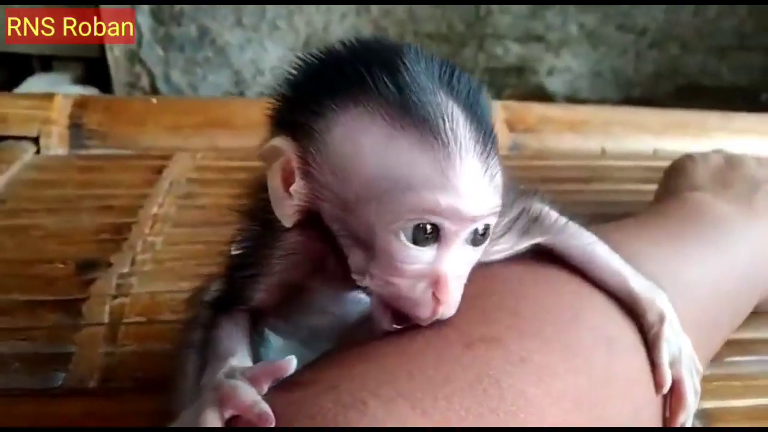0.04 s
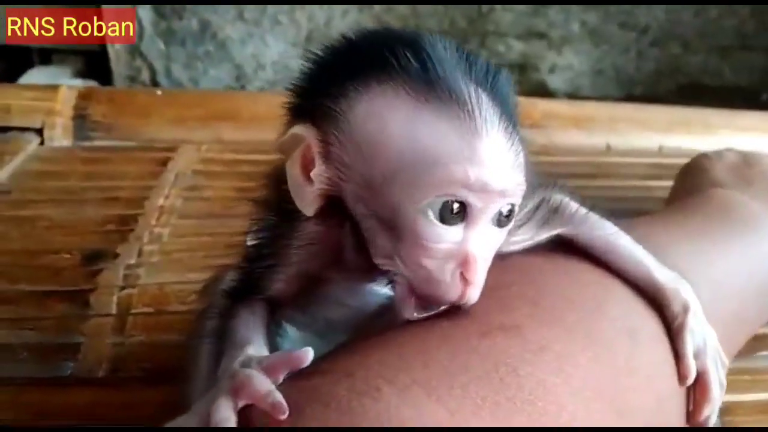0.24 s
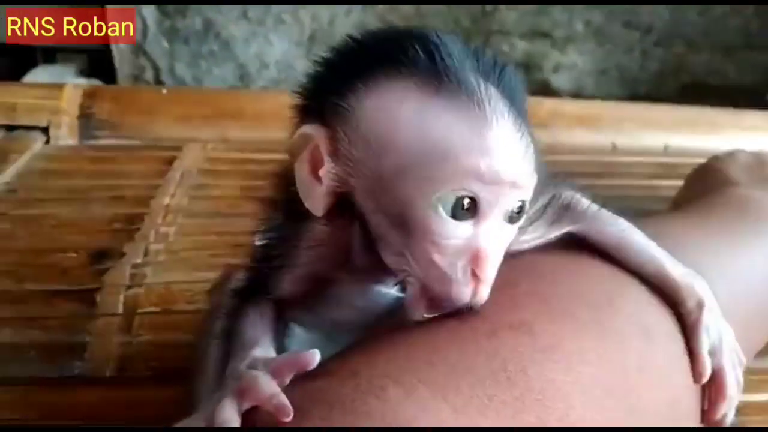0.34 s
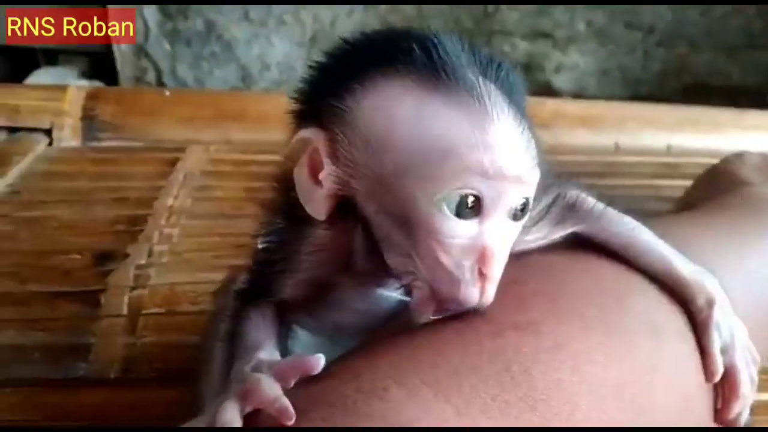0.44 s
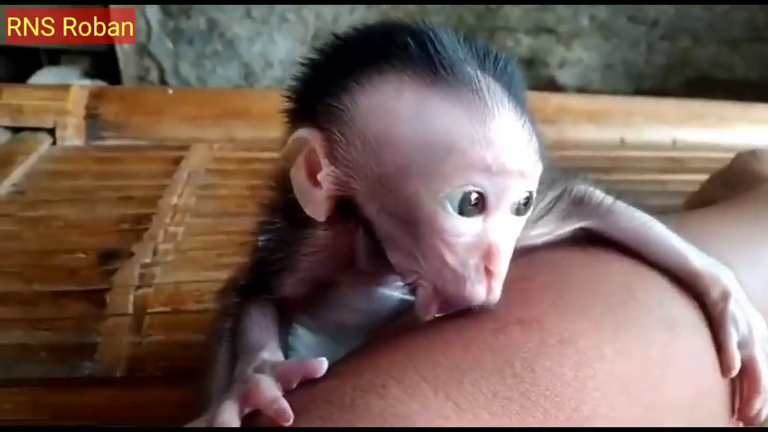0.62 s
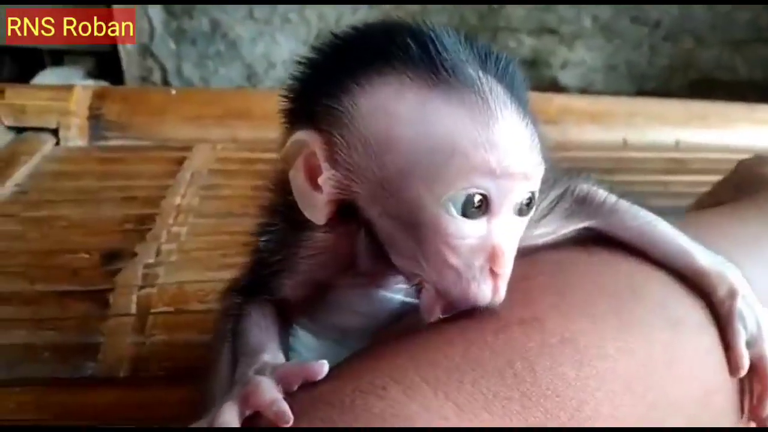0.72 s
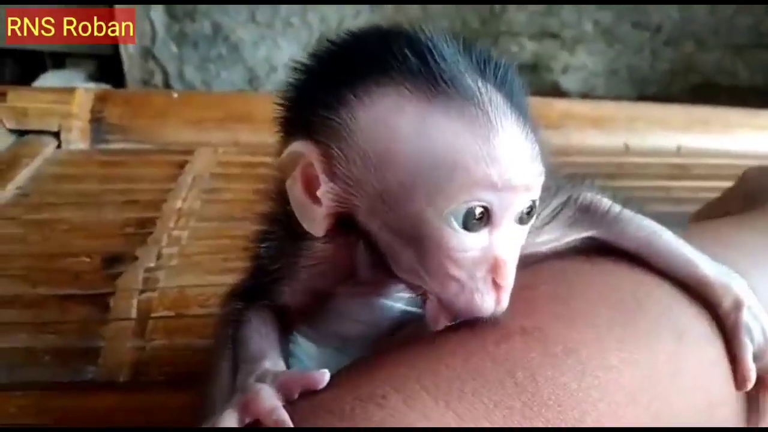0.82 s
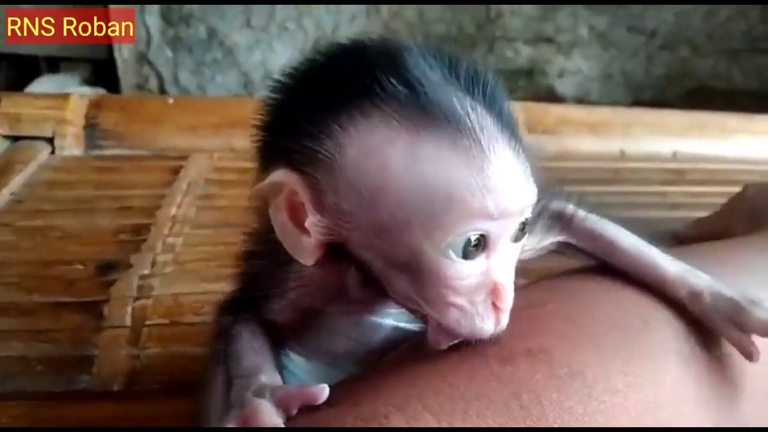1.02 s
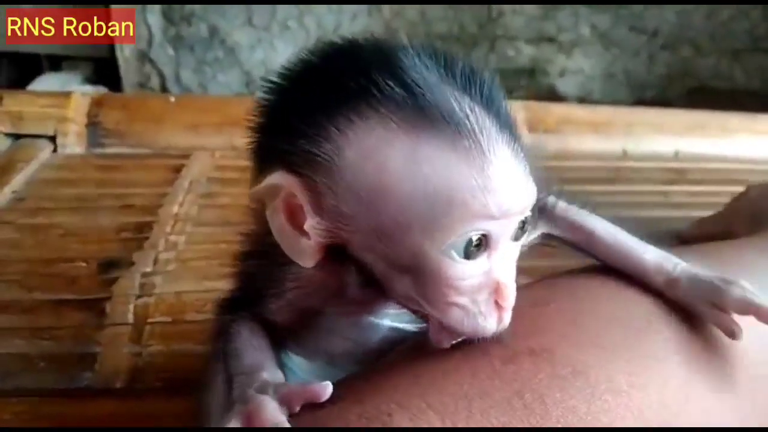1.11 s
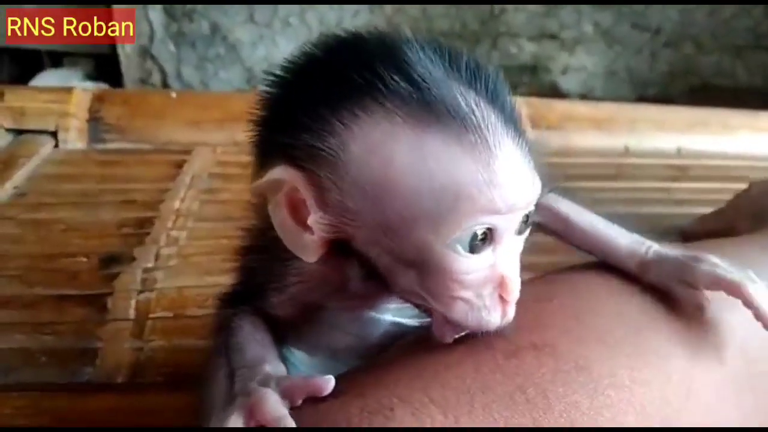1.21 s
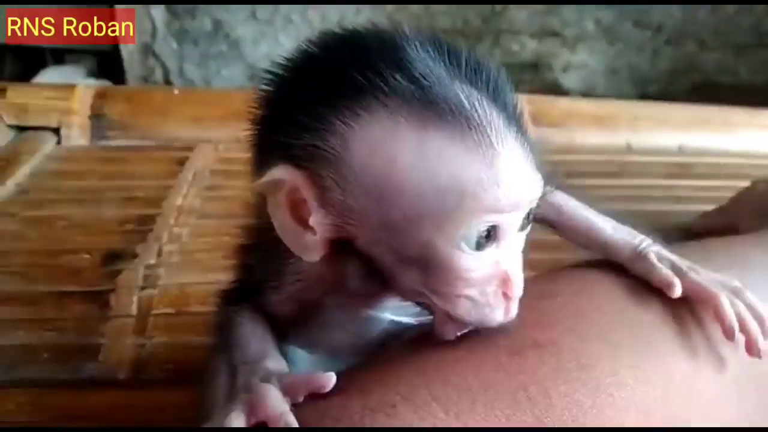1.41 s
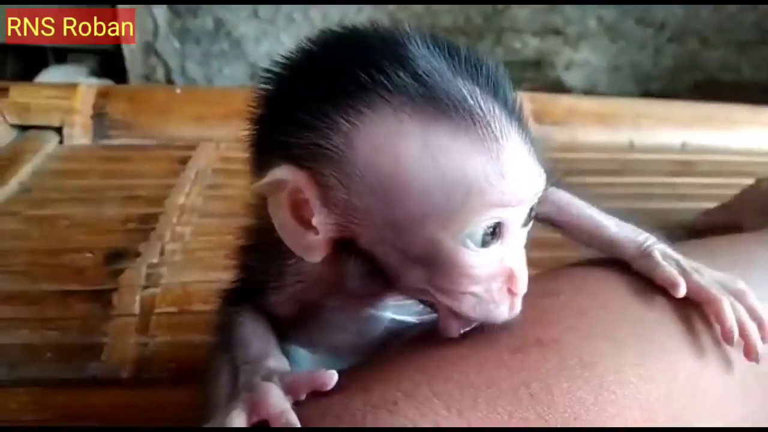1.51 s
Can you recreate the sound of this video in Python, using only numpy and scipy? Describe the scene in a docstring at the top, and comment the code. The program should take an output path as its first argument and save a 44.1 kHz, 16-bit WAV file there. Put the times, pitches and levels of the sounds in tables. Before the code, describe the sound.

Close up in a small room, a baby monkey lets out a shrill, slightly raspy squeal ending in two quick chirps. Then come a faint dry rustle, two soft microphone bumps and two small ticks, over a low outdoor rumble.

```python
"""A small room, a baby monkey close to a phone. It squeals once: a clear rising whistle that starts
to waver and breaks into two falling chirps, its partials shaped by the mouth and roughened by rasp.
The room answers, and more faintly the yard. Far birds whistle outside over a rumble of air and traffic.
A dry rustle follows, then two soft thumps through the phone's body, two ringing ticks and a scrape."""
import sys
import numpy as np
from scipy import signal
from scipy.fft import rfft, irfft, next_fast_len
from scipy.io import wavfile
from scipy.ndimage import uniform_filter1d, map_coordinates

SR = 44100
rng = np.random.default_rng(int(sys.argv[2]) if len(sys.argv) > 2 else 0)


def master(y):
    """Save y as 16-bit WAV."""
    cut = np.clip(np.atleast_2d(y).T, -1, 1)
    pcm = np.round(cut * 32767)  # scale
    wavfile.write(sys.argv[1], SR, pcm.astype(np.int16))


N = 68355
T = np.arange(N) / SR
TOP_HZ = 15720


def amp(db):
    """dB to gain."""
    return 10 ** (np.asarray(db) / 20)


def unit(x):
    """Scale to rms 1."""
    return x / np.sqrt(np.mean(x ** 2) + 1e-20)


def over_hz(points, hz):
    """Interpolate (freq_hz, value) points on a log axis."""
    freq_hz, value = np.transpose(points)
    return np.interp(np.log(hz + 1), np.log(freq_hz + 1), value)


def over_time(points):
    """Interpolate (time_s, value) points at every sample."""
    return np.interp(T, *np.transpose(points))


def wobble(rate_hz):
    """Smooth random curve, rms near 1."""
    return map_coordinates(rng.standard_normal(4096), [T * rate_hz])


def gate(start_s, end_s, edge_s):
    """Window with soft edges."""
    return np.sin(np.pi / 2 * np.clip(np.minimum(T - start_s, end_s - T) / edge_s, 0, 1)) ** 2


def filtered(x, response):
    """Apply the gain response(hz)."""
    size = next_fast_len(N + SR // 2)
    return irfft(rfft(x, size) * response(np.fft.rfftfreq(size, 1 / SR)), size)[:N]


def rush(spectrum, patchy_db):
    """Coloured noise, rms 1, with random gain patches in time and frequency."""
    bins = signal.stft(rng.standard_normal(N), nperseg=512)[2]
    patches = uniform_filter1d(rng.standard_normal(bins.shape), size=4, axis=0)
    patches = uniform_filter1d(patches, size=10, axis=1)
    noise = signal.istft(bins * amp(patchy_db * unit(patches)), nperseg=512)[1][:N]
    return unit(filtered(noise, lambda hz: amp(over_hz(spectrum, hz))))


def echo(x, decays, gap_s):
    """Diffuse reverberation; decays: freq_hz, t60_s."""
    hz, t, bins = signal.stft(rng.standard_normal(SR // 2), SR, nperseg=256)
    tail = signal.istft(bins * amp(-60 * t / over_hz(decays, hz)[:, None]), SR, nperseg=256)[1]
    return signal.fftconvolve(np.pad(x, (round(gap_s * SR), 0)), tail / np.linalg.norm(tail))[:N]


def place(events, sound):
    """One copy of the sound per (start_s, gain_db)."""
    out = np.zeros(N + SR)
    for start_s, gain_db in events:
        out[round(start_s * SR):][:len(sound)] += amp(gain_db) * sound
    return out[:N]


def rumble():
    """Low murmur of air and far traffic."""
    # noise spectrum: freq_hz, density_db
    spectrum = [(15,-59.5),(42,-30.5),(55,-1.5),(95,-6.5),(130,1),(215,-4),(300,-8),(500,-8.5),(700,-16),(900,-17),(1050,-47),(2000,-55),(4000,-60),(6500,-51),(8000,-58.5),(15500,-69.5)]
    # envelope: time_s, level_db
    envelope = [(0,-54),(0.351,-52.5),(0.701,-54),(1.098,-54),(1.55,-55.5)]
    return amp(over_time(envelope)) * rush(spectrum, patchy_db=1.28)


def birds():
    """Thin whistles and faint twitter, blurred by distance."""
    # whistles: start_s, length_s, first_hz, last_hz, level_db, octave_db
    whistles = [(.08,.14,4350,4380,-68,-30),(.1,.08,3200,3190,-78,-30),(.155,.065,4100,4150,-74,-30),(.02,.03,2850,2850,-74,-30),(.84,.076,2430,2450,-60,-26),(.883,.042,3080,3120,-65,-14),(.925,.1,3200,3300,-59.5,-8),(1.015,.07,3280,3250,-67,-10),(.82,.26,1660,1680,-70,-30),(1.0,.11,5700,6050,-78,-30),(1.105,.08,4300,4300,-79,-30),(.7,.22,1110,1110,-72,-30),(1.24,.14,4650,4620,-81,-30),(1.2,.2,7300,7550,-89,-30),(1.2,.24,5150,5130,-83,-30),(1.17,.21,1400,1390,-76,-30),(1.355,.04,4100,4100,-78,-30),(1.38,.07,3250,3230,-82,-30),(1.37,.05,2700,2680,-81,-30),(1.385,.07,2350,2300,-75,-30),(1.03,.14,2950,3050,-77,-30),(1.06,.25,2350,2300,-78,-30)]
    # twitter bands: centre_hz, width_hz, gain_db
    twitter_bands = [(910,310,-2),(1090,100,-7),(1430,92,-2),(1610,97,-8.5),(2420,330,-8),(2860,76,-16),(3800,360,-17),(4560,170,-12.5),(5074,190,-16),(6185,360,-23)]
    # twitter envelope: time_s, level_db
    twitter_envelope = [(0,-65),(.1,-68),(.21,-64.5),(.3,-61.5),(.7,-70.5),(1.0,-74),(1.15,-78.5),(1.47,-91)]
    out = np.zeros(N)
    for start_s, length_s, first_hz, last_hz, level_db, octave_db in whistles:
        end_s = start_s + length_s
        pitch_hz = np.interp(T, [start_s, end_s], [first_hz, last_hz]) * (1 + .009 * wobble(150))
        phase = 2 * np.pi * np.cumsum(pitch_hz) / SR
        overtones = np.sin(2 * phase) + amp(-27) * np.sin(3 * phase) + amp(-24) * np.sin(4 * phase)
        envelope = amp(level_db + 5 * wobble(70)) * gate(start_s, end_s, edge_s=.014)
        out += envelope * (np.sin(phase) + amp(octave_db) * overtones)
    for centre_hz, width_hz, gain_db in twitter_bands:
        band = filtered(rng.standard_normal(N), lambda hz: np.exp(-((hz - centre_hz) / width_hz) ** 2))
        out += amp(over_time(twitter_envelope) + gain_db + 5.5 * wobble(8)) * unit(band)
    return out + amp(-4) * echo(out, [(1000, .55)], gap_s=.0033)


def rustle():
    """One flickering swell of dry hiss."""
    # envelope: time_s, level_db
    swell = [(0.618,-87),(0.691,-74),(0.741,-64.5),(0.802,-64),(0.879,-75),(0.982,-93)]
    # noise spectrum: freq_hz, density_db
    spectrum = [(1470, -64), (2500, -37), (2590, -21), (3970, -6), (4380, 0.5), (6120, -15), (6400, -41),
                (8000, -42), (9600, -52), (10300, -32), (11200, -54.5), (17600, -89.5)]
    envelope = amp(over_time(swell) + 1.3 * wobble(88.3)) * gate(swell[0][0], swell[-1][0], edge_s=.05)
    return envelope * rush(spectrum, patchy_db=2.5)


def scrape():
    """Soft scraping noise that rises at the very end."""
    # envelope: time_s, level_db
    rise = [(1.487,-74),(1.5,-70.5),(1.535,-72),(1.545,-62),(1.55,-48)]
    # noise spectrum: freq_hz, density_db
    spectrum = [(710, -41), (1200, -2), (1300, -25.5), (1730, -9), (3920, -14.5), (8000, -41.5),
                (10400, -68), (17600, -120)]
    return amp(over_time(rise)) * gate(rise[0][0], 2, edge_s=.0028) * rush(spectrum, patchy_db=2.5)


def thumps():
    """Soft bumps through the phone's body: a brief swelling wave whose pitch sags."""
    # bumps: start_s, peak_db
    bumps = [(.9092,-29.5),(1.0302,-27.7)]
    first_hz, settled_hz = 1480, 325
    sag_s, swell_s, decay_s = .0009, .0019, .0027
    t = T[:SR // 20]
    cycles = settled_hz * t + (first_hz - settled_hz) * sag_s * (1 - np.exp(-t / sag_s))
    envelope = (1 - np.exp(-(t / swell_s) ** 4)) * np.exp(-t / decay_s)
    return place(bumps, -envelope / envelope.max() * np.sin(2 * np.pi * cycles))


def ticks():
    """Small dry ticks: a few fast-decaying modes, low-passed."""
    # hits: start_s, gain_db
    hits = [(1.493, -33.5), (1.5407, -33)]
    # modes: freq_hz, level_db, t60_s
    modes = [(2120,2,0.0037),(3660,4,0.0023),(5100,-9,0.0053),(887,-9.5,0.0062)]
    attack_s, cutoff_hz = .00015, 5800
    t = T[:SR // 20]
    ring = sum(amp(db - 60 * t / t60_s) * np.sin(2 * np.pi * hz * t) for hz, db, t60_s in modes)
    tick = ring * (1 - np.exp(-t / attack_s)) ** 3
    return filtered(place(hits, tick), lambda hz: 1 / np.sqrt(1 + (hz / cutoff_hz) ** 16))


def monkey():
    """Partials coloured by the mouth; rasp puts a noise halo round each and lets air hiss."""
    # squeal: time_s, pitch_hz, effort_db, tilt_db_per_octave, rasp_db
    squeal = [(.2175,1181,-36.5,2.5,-28.5),(.222,1250,-27,1,-31),(.235,1329,-23,1.5,-41.5),(.256,1497,-20.5,0,-39.5),(.267,1542,-21,1,-47),(.309,1547,-22,0.5,-37.5),(.331,1636,-22.5,4.5,-38.5),(.346,1727,-19,1.5,-37.5),(.355,1926,-21,3.5,-31),(.361,1995,-18,-3,-37),(.383,1974,-18.5,-3,-31.5),(.392,1840,-24.5,1,-30.5),(.4056,1891,-19,-2,-40),(.413,1945,-19,-2,-27.5),(.4215,1984,-18.5,-3,-40.5),(.439,1876,-22,-2.5,-36.5),(.458,2056,-18.5,-4.5,-37.5),(.469,1934,-20,-5.5,-27),(.4755,1683,-22,1.5,-20.5),(.482,1820,-25.5,-8.5,-33),(.4924,2009,-17.5,-4,-39),(.4995,1999,-22.5,-1.5,-33),(.508,1751,-22,-1,-30.5),(.513,1566,-32,0.5,-13),(.518,1561,-40.5,-1.5,-14.5)]
    # two falling chirps, a table each: columns as in squeal
    chirps = [
        [(.527,1859,-40.5,-11,-31.5),(.531,1942,-19.5,-0.5,-32),(.536,1868,-24,-3,-27.5),(.541,1756,-17.5,-8,-26.5),(.5475,1553,-26,1,-3.5),(.553,1345,-35.5,-2,-19.5),(.557,1236,-51.5,1,-20)],
        [(.573,1741,-33.5,-16,-28),(.5765,1817,-19.5,-0.5,-31.5),(.582,1787,-19.5,-4,-26),(.588,1608,-26.5,-3,-22),(.5964,1585,-29,-1,-22.5),(.603,1442,-41,2.5,-12.5)],
    ]
    # mouth and microphone response: freq_hz, gain_db
    mouth = [(1100,-1.5),(1500,2),(1750,1.5),(1880,3),(1990,-4),(2070,-5.5),(2550,-12.5),(2780,-18.5),(3100,-5.5),(3450,-11),(3680,-8),(3950,-5),(4300,-6.5),(4700,-17),(5100,-20.5),(5700,-30.5),(6300,-40),(7500,-48.5),(9000,-57.5),(11000,-37.5),(12500,-50.5),(14000,-41),(15500,-52)]
    # treble envelope: time_s, gain_db
    treble = [(.22,0),(.35,-4.5),(.362,-10.5),(.385,-10.5),(.392,1),(.412,7),(.422,-4.5),(.465,-3),(.473,5),(.482,4.5),(.495,-2.5),(.51,7),(.53,2),(.55,4),(.575,0.5),(.584,-4.5),(.59,7.5),(.6,-7)]
    # breath spectrum: freq_hz, gain_db
    breath = [(600,-58),(1200,-24),(2000,-18),(2800,-16),(4000,-13),(5200,-14),(6300,-28),(8500,-29),(11000,-20),(13000,-22),(15500,-24)]
    glide_s, jitter, shimmer_db = .0016, .003, .5
    treble_hz, flutter_db = 6500, 2
    halo_hz, halo_db, hiss_db = 1100, -4, 2

    notes = [squeal, *chirps]
    time_s, *columns = np.concatenate(notes).T
    contour_hz, effort_db, tilt_db_per_octave, rasp_db = (np.interp(T, time_s, c) for c in columns)
    pitch_hz = uniform_filter1d(contour_hz, size=round(glide_s * SR)) * (1 + jitter * wobble(300))
    phase = 2 * np.pi * np.cumsum(pitch_hz) / SR
    effort = amp(effort_db) * sum(gate(note[0][0], note[-1][0], edge_s=.0024) for note in notes)
    treble_db = over_time(treble)
    voice = np.zeros(N)
    for k in range(1, 14):
        partial_hz = k * pitch_hz
        rasp = k ** 1.25 * amp(rasp_db + halo_db)
        halo = rasp * (wobble(halo_hz) * np.sin(k * phase) + wobble(halo_hz) * np.cos(k * phase))
        partial = (np.sin(k * phase) + halo) / np.sqrt(1 + rasp ** 2)
        level_db = tilt_db_per_octave * np.log2(k) + over_hz(mouth, partial_hz) + shimmer_db * wobble(150)
        level_db += (treble_db + flutter_db * wobble(120)) / (1 + (treble_hz / partial_hz) ** 8)  # shelf
        voice += amp(level_db) * (partial_hz < TOP_HZ) * partial
    hiss = effort * amp(rasp_db + hiss_db) * rng.standard_normal(N)
    low_air = filtered(hiss, lambda hz: amp(over_hz(breath, hz)) * (hz < treble_hz))
    high_air = filtered(hiss * amp(treble_db), lambda hz: amp(over_hz(breath, hz)) * (hz >= treble_hz))
    return np.sqrt(2) * effort * voice + low_air + high_air


def scene():
    """Mono mix; the monkey and the ticks echo in room and yard."""
    # room decay: freq_hz, t60_s
    room_decay = [(500, 0.48), (2000, 0.38), (3200, 0.17), (5000, 0.21), (8000, .6), (12000, 0.57)]
    near = monkey() + ticks()
    room = amp(-17.5) * echo(near, room_decay, gap_s=.0055)
    yard = amp(-33.5) * echo(near, [(1000, .43)], gap_s=.019)
    return (near + room + yard + thumps() + birds() + rustle() + scrape() + rumble())[None]


def record(dry):
    """The phone's band limit."""
    return filtered(dry[0], lambda hz: hz < TOP_HZ)[None]


dry = scene()
out = record(dry)
master(out)
```